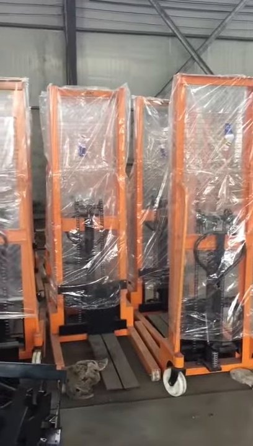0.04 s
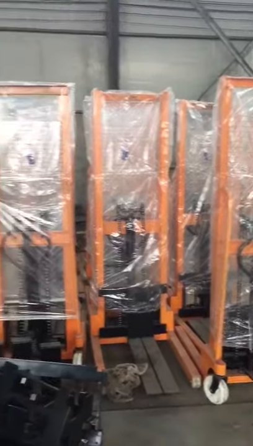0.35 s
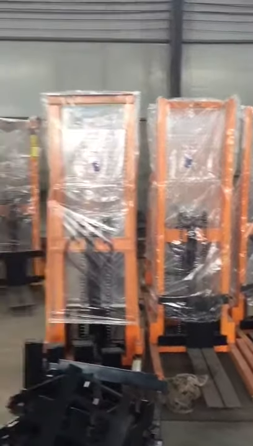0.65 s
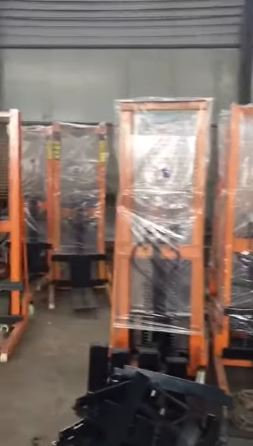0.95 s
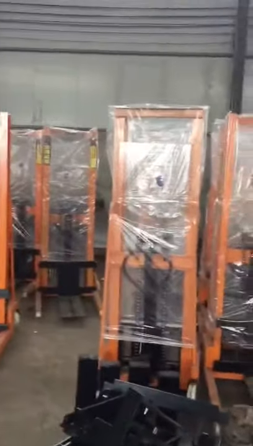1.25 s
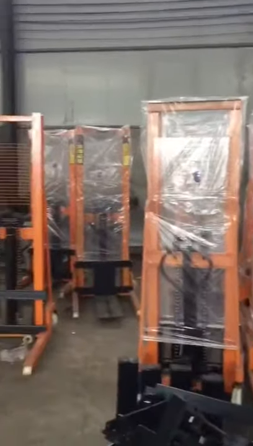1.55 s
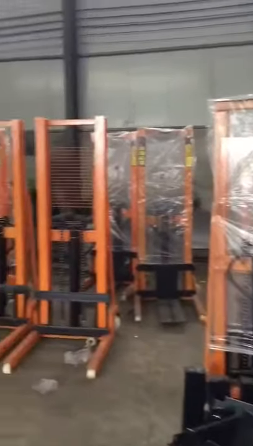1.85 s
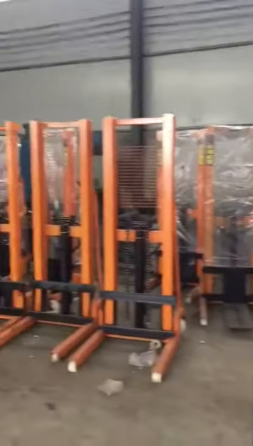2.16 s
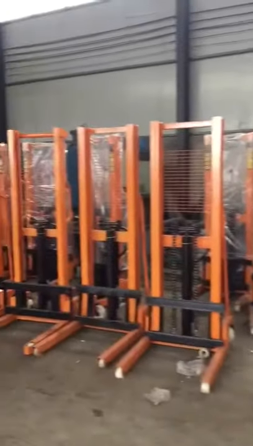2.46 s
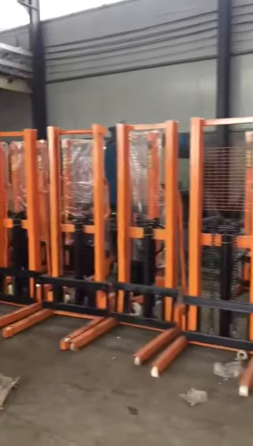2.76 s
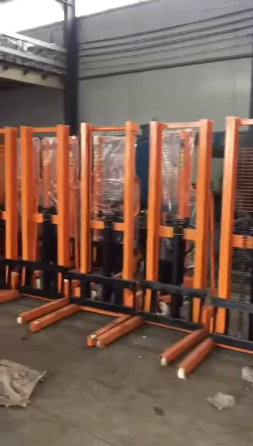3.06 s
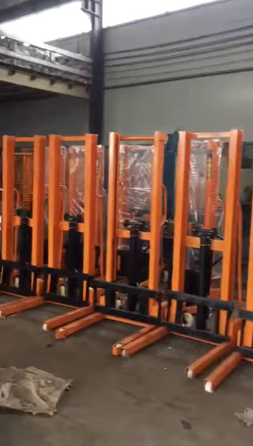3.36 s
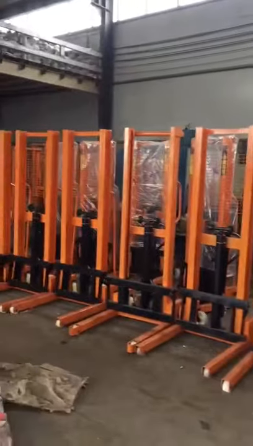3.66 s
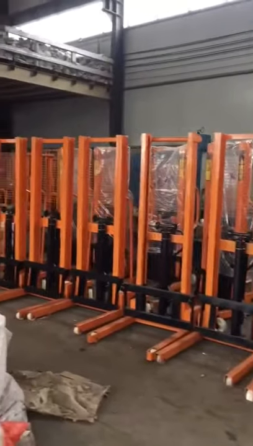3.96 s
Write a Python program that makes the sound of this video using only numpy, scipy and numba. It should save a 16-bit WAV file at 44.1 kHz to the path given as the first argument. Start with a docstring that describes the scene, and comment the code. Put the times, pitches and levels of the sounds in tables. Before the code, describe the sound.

A harsh, distant bark, perhaps a dog, dies away in a big factory hall. Soft footsteps, gritty clicks and small knocks sound near the moving microphone over low rumble and hiss, then two more barks echo.

```python
"""A harsh, far-off burst like a bark (perhaps a dog) dies away in a big steel-walled factory hall.
Low rumble and thin hiss go on, with soft footfalls, gritty clicks and small knocks close by, as a
phone is carried slowly over the concrete floor. Near the end come two more bursts. Each is a rough
buzz shaped by resonances (pitch ranges that ring), and the hall makes it echo. Footfalls are short
swings of bass, clicks are puffs of noise, and knocks are a few quickly fading tones."""
import sys
import numpy as np
from scipy import signal
from scipy.fft import rfft, irfft
from scipy.io import wavfile
from scipy.ndimage import uniform_filter1d
from numba import njit

SR = 44100
rng = np.random.default_rng(int(sys.argv[2]) if len(sys.argv) > 2 else 0)


def store_wav(level_fs):
    """Save 16-bit WAV to argv[1]."""
    pcm = np.round(np.clip(np.atleast_2d(level_fs), -1, 1) * 32767)
    wavfile.write(sys.argv[1], SR, pcm.T.astype(np.int16))


N = 176400
LEAD = SR // 2  # extra samples before time zero, so the hall is already ringing
T = np.arange(-LEAD, N) / SR

# The tone of the rumble and of the hiss. Each row: frequency in Hz, relative level in dB.
RUMBLE_SPECTRUM = [(25, -24), (40, -8), (58, 0.5), (100, -5.5), (135, -4), (175, -3.5), (215, -8),
                   (275, -13.5), (360, -20), (460, -28)]
HISS_SPECTRUM = [(400, -5), (620, -1), (1000, -4), (1600, -5.5), (2300, -9), (3200, -10.5), (4500, -14.5),
                 (6000, -15), (7600, -19)]
# How the rumble rises and falls. Each row: time in seconds, level in dB.
RUMBLE_LOUDNESS = [(0, -52.5), (.7, -57.5), (.92, -54), (1.0, -61), (1.18, -55.5), (1.42, -55.5),
                   (1.66, -59), (1.98, -58), (2.1, -62.5), (2.44, -53.5), (2.66, -59), (3.05, -54.5),
                   (3.22, -57.5), (3.55, -53), (4, -50.5)]
# How long the hall rings. Each row: frequency in Hz, seconds to fade by 60 dB.
HALL_RING_TIMES = [(300, 0.16), (700, 1.26), (1300, 1.69), (2300, 1.15), (4000, 2.28), (8000, 1.1)]
# Footfalls and bumps of the hand on the phone.
# Each row: middle of the thud in seconds, level in dB, pitch in Hz, fade time in seconds.
SOFT_THUDS = [(0.794, -51.5, 85, 0.01), (0.869, -45, 70, .007), (0.895, -44, 93, 0.007),
              (0.937, -49.5, 111.8, 0.011), (1.094, -40.5, 75.7, .009), (1.327, -51.5, 125, 0.0099),
              (1.415, -47.5, 93, 0.0091), (1.451, -48, 76.4, 0.015), (1.991, -45, 58.7, 0.017),
              (2.314, -43.5, 61.5, .014), (2.385, -40.5, 221, .0025), (2.46, -47.5, 58.6, 0.022),
              (3.013, -42.5, 97, 0.0045), (3.248, -34.5, 101.5, 0.0034)]
# Gritty clicks and scuffs.
# Each row: start in seconds, level in dB, centre in Hz, width in Hz, fade time in seconds.
GRIT_CLICKS = [(.280, -70.5, 4800, 4300, 0.03), (.703, -52, 2370, 796, 0.0068),
               (.770, -74, 3030, 2500, 0.039), (.85, -70.5, 804, 694, 0.054),
               (0.926, -64.5, 1080, 1420, .02), (1.075, -64.5, 600, 704, 0.013),
               (1.18, -67, 2000, 2400, 0.04), (1.204, -58.5, 2100, 900, 0.0095),
               (1.225, -63, 1590, 2200, 0.054), (1.254, -54.5, 1600, 2000, 0.012),
               (1.812, -73, 2350, 700, 0.05), (2.21, -73.5, 1870, 353, .033),
               (2.381, -52.5, 664, 494, 0.0029), (2.512, -66.5, 1950, 500, 0.035),
               (2.905, -68, 1900, 800, 0.018), (3.166, -72, 1700, 718, .018),
               (3.32, -72.5, 7100, 1497, 0.038), (3.482, -68.5, 5800, 2200, .014)]
# Knocks and clinks of small loose parts.
# Each row: start in seconds, level in dB, strongest tone in Hz, fade time in seconds.
HARD_KNOCKS = [(.7045, -44.5, 2326, 0.0047), (.7085, -51, 2150, 0.0097), (1.2028, -44.5, 2030, 0.0026),
               (1.2533, -40.5, 1790, .0027), (1.257, -37.5, 1770, 0.0024), (1.269, -50, 1800, .003),
               (2.533, -54.5, 1960, 0.013), (2.92, -62, 1950, .009), (3.126, -61, 2580, 0.0087)]
# The tones in one knock. Each row: multiple of the strongest tone, level in dB, multiple of fade time.
KNOCK_TONES = [(.42, -17, 1.1), (.8, -14.5, .8), (1, -2, 1), (1.25, -8.5, .65), (1.52, -20, .4)]
# How each of the three barks changes. Each row: time in seconds, level in dB, pitch in Hz, the low,
# main and upper resonances in Hz, low and upper levels in dB next to the main one, roughness 0 to 1.
OPENING_BARK = [(-.25, -29.5, 680, 730, 1520, 2200, -9.5, -15, .9),
                (-.16, -37, 747, 750, 1490, 2130, -6.5, -15.5, 0.75),
                (-.09, -33.5, 610, 736, 1220, 2200, -9.5, -21, 0.81),
                (-.02, -35.5, 572.4, 687, 1170, 2263, -13, -17.5, .42),
                (.04, -57, 561, 650, 1038, 2280, -3.5, -9, 0.1)]
SHARP_BARK = [(3.29, -45, 640, 850, 1400, 1750, 2, 0.5, 0.97),
              (3.322, -32, 681.3, 907, 1370, 1660, -6.5, 1.5, 1),
              (3.345, -30, 688, 905, 1335, 1790, -4.5, -6.5, 0.92),
              (3.365, -24.5, 711.4, 885, 1376, 2500, -15.5, -20, .48),
              (3.40, -32, 690.3, 850, 1365, 2520, -3, -14, 0.94),
              (3.475, -29.5, 709.5, 820, 1390, 2560, -7.5, -11.5, 0.76),
              (3.52, -47.5, 651, 700, 1350, 2370, 6, -19, 0.98)]
LONG_BARK = [(3.62, -42, 631.6, 616, 1265, 2455, 3.5, -18.5, .4),
             (3.65, -33, 652, 673, 1310, 2280, 1.5, -13.5, 0.55),
             (3.69, -32.5, 675.8, 726, 1455, 2220, -1, -10.5, 0.98),
             (3.725, -29, 628.3, 1013, 1248, 2363, -0.5, -14, 1),
             (3.785, -25.5, 604, 1058, 1180, 2424, -3, -10, 0.49),
             (3.84, -35.5, 596.6, 956, 1207, 2390, -5, -16, 0.67),
             (3.89, -38, 564, 737, 1150, 2210, -2, -4.5, 1)]


def gain(db):
    """Turn decibels into a number to multiply by."""
    return 10 ** (np.asarray(db) / 20)


def unit(x):
    """Scale a signal so its average strength (rms) is 1."""
    return x / np.sqrt(np.mean(x ** 2))


def steady(x):
    """Hold a signal's strength near 1 from moment to moment."""
    return x / np.sqrt(uniform_filter1d(x ** 2, size=1200) + 1e-12)


def noise():
    """White noise as long as the scene."""
    return rng.standard_normal(len(T))


def wander(rate_hz):
    """A smooth random drift, about 1 in size."""
    step = int(SR / rate_hz)
    stairs = np.repeat(rng.standard_normal(len(T) // step + 1), step)
    return unit(uniform_filter1d(uniform_filter1d(stairs, step), step)[:len(T)])


def shaped_noise(spectrum):
    """Noise that follows a spectrum table and drops steeply past its ends."""
    hz, db = np.array(spectrum).T
    freqs = np.maximum(np.fft.rfftfreq(len(T), 1 / SR), 1)
    roll_off = np.minimum(freqs / hz[0], 1) ** 4 * np.minimum(hz[-1] / freqs, 1) ** 4
    shape = gain(np.interp(np.log(freqs), np.log(hz), db))
    return unit(irfft(rfft(noise()) * roll_off * shape, len(T)))


def keep_side(x, side, hz, order):
    """Let through the "low" or the "high" side of a frequency."""
    return signal.sosfilt(signal.butter(order, hz, side, fs=SR, output="sos"), x)


@njit
def band_pass(x, hz, width_hz):
    """Let through the sound near a centre frequency that can move."""
    out, band_state, low_state = np.empty(len(x)), 0., 0.
    for i in range(len(x)):
        tuning, damping = np.tan(np.pi * hz[i] / SR), width_hz / hz[i]
        band = (band_state + tuning * (x[i] - low_state)) / (1 + tuning * (tuning + damping))
        band_state = 2 * band - band_state
        low_state += 2 * tuning * band
        out[i] = damping * band
    return out


def resonance(x, hz, width_hz):
    """A steep resonance: the band-pass used twice."""
    centre, width = hz + np.zeros(len(x)), float(width_hz)
    return band_pass(band_pass(x, centre, width), centre, width)


def rumble_and_hiss(hiss_db=-69, rumble_waver_db=2, hiss_waver_db=.5):
    """The hall's wavering low rumble under a thin, even hiss."""
    rumble_db = np.interp(T, *np.array(RUMBLE_LOUDNESS).T)
    rumble = shaped_noise(RUMBLE_SPECTRUM) * gain(rumble_db + rumble_waver_db * wander(14))
    hiss = shaped_noise(HISS_SPECTRUM) * gain(hiss_db - hiss_waver_db * wander(3.8))
    return rumble + hiss


def hall(x, tail_db=-1, build_s=.037, echo_db=-9.5, echo_span_s=.07, echo_count=14):
    """The walls send back a few echoes, then a dense ringing tail whose bass dies first."""
    t = np.arange(2 * SR) / SR
    freqs = np.maximum(np.fft.rfftfreq(len(t), 1 / SR), 1)
    hz, ring_times = np.array(HALL_RING_TIMES).T
    white = rfft(rng.standard_normal(len(t)))
    tail, echoes = np.zeros((2, len(t)))
    for one_band, ring_s in zip(np.eye(len(hz)), ring_times):
        band = irfft(white * np.interp(np.log(freqs), np.log(hz), one_band))
        tail += band * gain(-60 * t / ring_s)
    longest_ring_energy = SR * ring_times.max() / (2 * np.log(1000))
    tail *= (1 - np.exp(-t / build_s)) / np.sqrt(longest_ring_energy)
    strengths = unit(rng.standard_normal(echo_count)) / np.sqrt(echo_count)
    delays = (SR * echo_span_s * (.1 + rng.random(echo_count))).astype(int)
    echoes[delays] = strengths
    return signal.fftconvolve(x, gain(tail_db) * tail + gain(echo_db) * echoes)[:len(T)]


def thuds():
    """Each soft blow of a foot or hand is a swing or two of bass."""
    return sum(gain(db) * np.sin(2 * np.pi * hz * (T - middle)) * np.exp(-((T - middle) / fade) ** 2)
               for middle, db, hz, fade in SOFT_THUDS)


def clicks(attack_s=.0026):
    """Grit underfoot: short puffs of noise in one resonance, dull above it."""
    out = np.zeros(len(T))
    t = np.arange(SR // 4) / SR
    for start, db, hz, width_hz, fade in GRIT_CLICKS:
        grit = resonance(rng.standard_normal(len(t)), hz, width_hz)
        grit = unit(keep_side(grit, "low", 1.57 * hz, order=4))
        at = LEAD + int(start * SR)
        out[at:at + len(t)] += gain(db) * 2 * grit * (1 - np.exp(-t / attack_s)) * np.exp(-t / fade)
    return out


def knocks(contact_s=.00033):
    """Small hard parts tap, bounce and clink: a few short tones, their start softened by the contact."""
    out = np.zeros(len(T))
    t = np.arange(SR // 10) / SR
    for start, db, hz, fade in HARD_KNOCKS:
        ring = sum(gain(tone_db) * np.sin(2 * np.pi * hz * ratio * t) * np.exp(-t / (fade * hold))
                   for ratio, tone_db, hold in KNOCK_TONES)
        at = LEAD + int(start * SR)
        out[at:at + len(t)] += gain(db) * ring * (1 - np.exp(-t / contact_s))
    return out


def rough_buzz(pitch, roughness, pitch_shake=.0293, flutter_db=4.5):
    """The raw sound of a bark: uneven pulses, plus rasping noise that throbs in step with them."""
    phase = 2 * np.pi * np.cumsum(pitch * (1 + roughness * pitch_shake * wander(400))) / SR
    pulses = sum(np.cos(k * phase) for k in range(1, 7))
    pulses *= gain(roughness * flutter_db * wander(500))
    rasp = unit(resonance(noise(), hz=1460, width_hz=3100)) * (1 + np.cos(phase) / 2)
    return unit(pulses) + 1.683 * roughness * rasp


def bark(curve, upper_width_hz, breath_db, chest_db, hiss_db, top_hz, attack_s=.012):
    """A buzz rings three gliding resonances; noise adds breath, a fixed chesty ring and faint hiss."""
    times, *columns = np.array(curve).T
    db, pitch, low_hz, main_hz, upper_hz, low_db, upper_db, roughness = (
        np.interp(T, times, column) for column in columns)
    wobble = 1 + .022 * roughness * wander(55)  # moves the pitch and two resonances together
    buzz = rough_buzz(pitch * wobble, roughness)
    low = gain(low_db) * steady(resonance(buzz, low_hz * wobble, width_hz=170))
    main = steady(resonance(buzz, main_hz * wobble, width_hz=196))
    upper = gain(upper_db) * steady(resonance(buzz, upper_hz, upper_width_hz))
    breath = resonance(noise(), hz=1450, width_hz=2000)
    # The breath is weak between the low and the main resonance.
    dip = band_pass(breath, hz=np.full(len(T), 1040.), width_hz=230.)
    breath = gain(breath_db) * unit(breath - dip)
    chest = gain(chest_db) * steady(resonance(noise(), hz=720, width_hz=240))
    hiss = gain(hiss_db) * unit(resonance(noise(), hz=4000, width_hz=6000))
    loudness = gain(db) * np.clip((T - times[0]) / attack_s, 0, 1) * (T < times[-1])
    voice = (low + main + upper + breath + chest) * loudness
    voice = keep_side(voice, "high", hz=564, order=6)
    return keep_side(voice, "low", top_hz, order=6) + hiss * loudness


def scene(far_direct_db=-4.5, near_to_hall_db=-8.5):
    """Far barks with plenty of echo, near clicks and knocks with little, thuds and background with none."""
    far = bark(OPENING_BARK, upper_width_hz=170, breath_db=-15.5, chest_db=-16.5,
               hiss_db=-38.5, top_hz=2540)
    far += bark(SHARP_BARK, upper_width_hz=280, breath_db=-7.5, chest_db=-13.5,
                hiss_db=-39.5, top_hz=2910)
    far += bark(LONG_BARK, upper_width_hz=170, breath_db=-10.5, chest_db=-11, hiss_db=-46, top_hz=2430)
    near = clicks() + knocks()
    echo = hall(far + gain(near_to_hall_db) * near)
    mix = gain(far_direct_db) * far + near + echo + thuds() + rumble_and_hiss()
    return mix[None, LEAD:]


def record(dry):
    """The phone steeply cuts the treble above 7600 Hz."""
    return signal.sosfilt(signal.ellip(10, .2, 70, 7600, fs=SR, output="sos"), dry)


dry = scene()
out = record(dry)
store_wav(out)
```